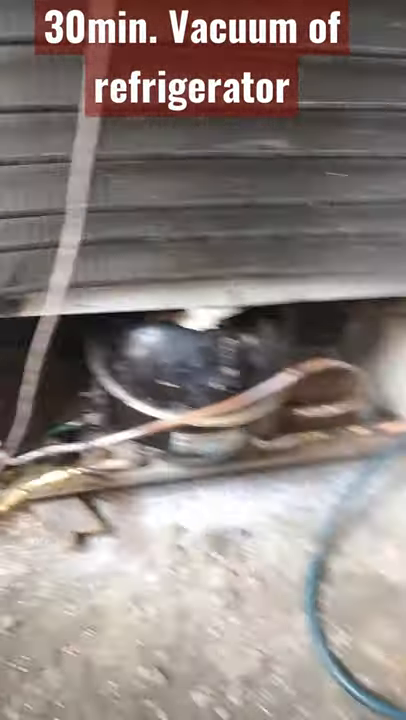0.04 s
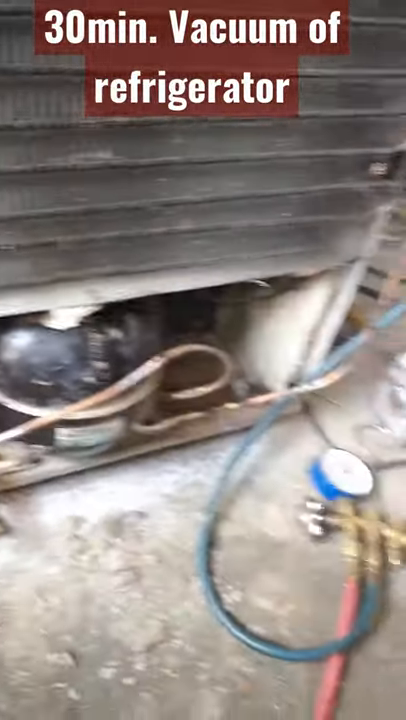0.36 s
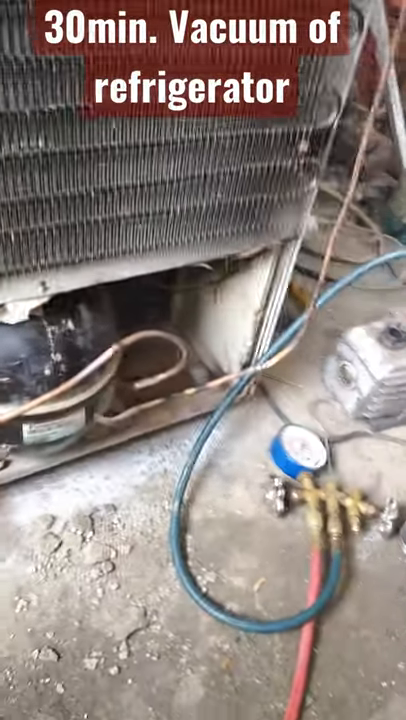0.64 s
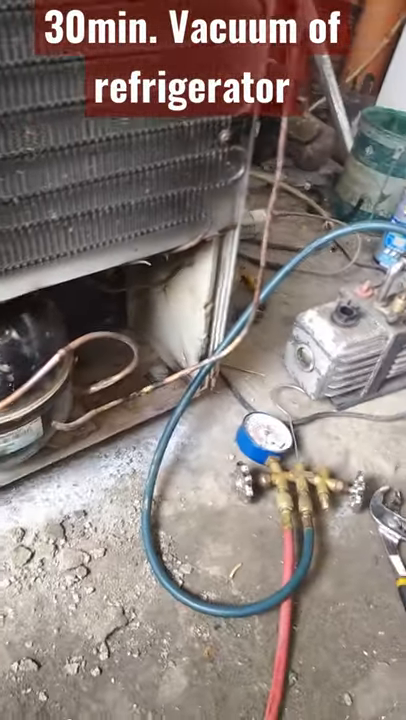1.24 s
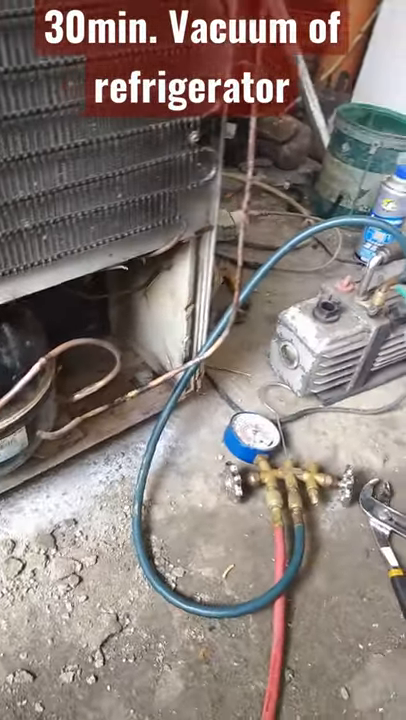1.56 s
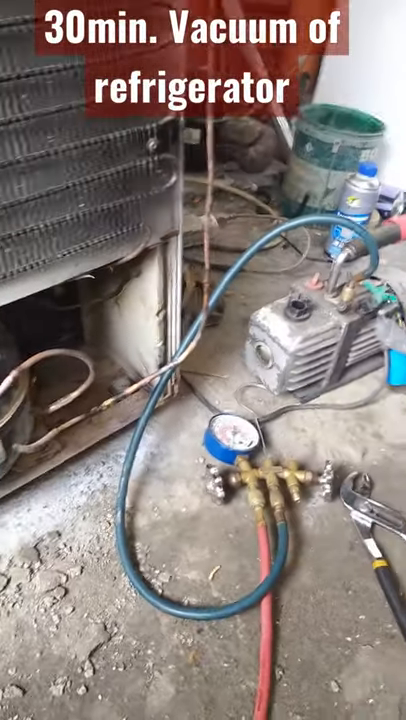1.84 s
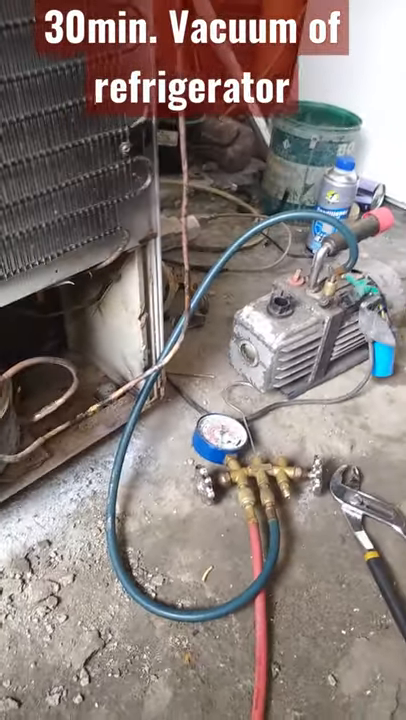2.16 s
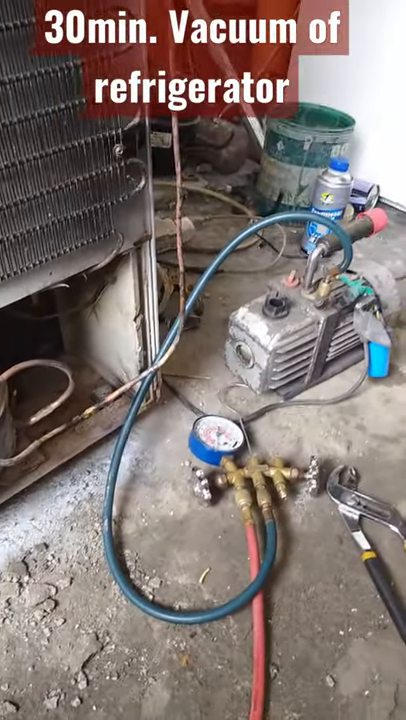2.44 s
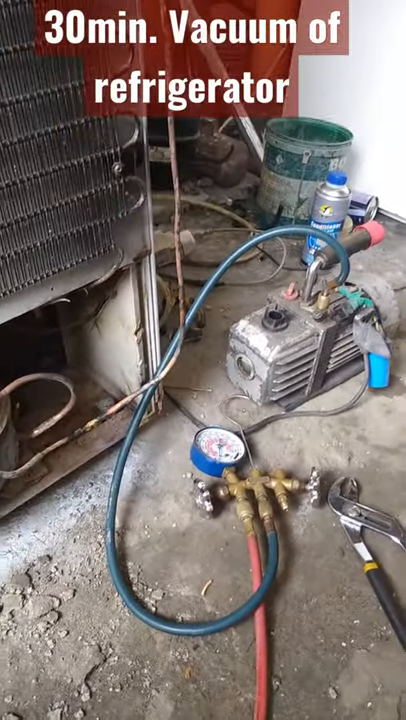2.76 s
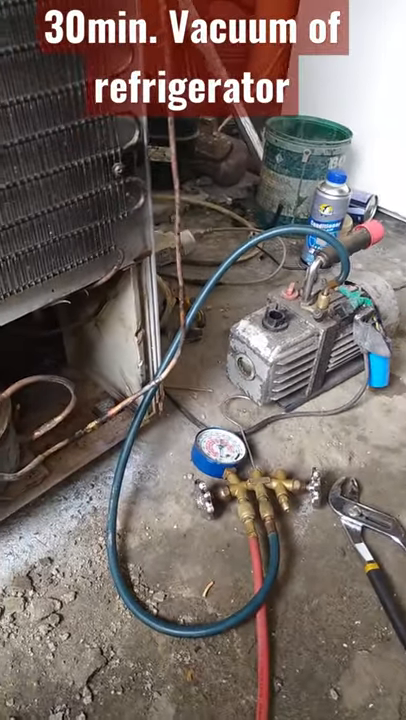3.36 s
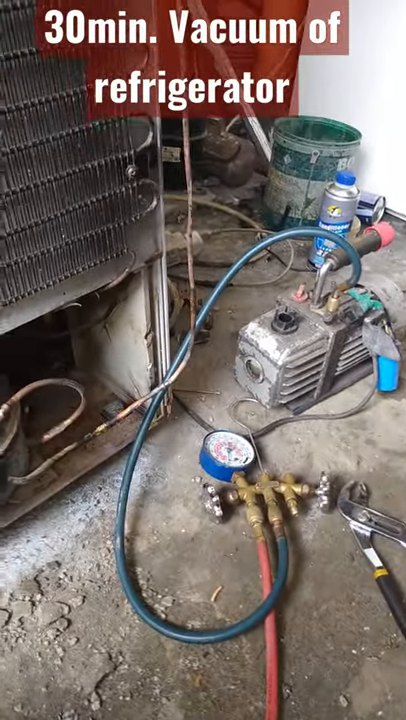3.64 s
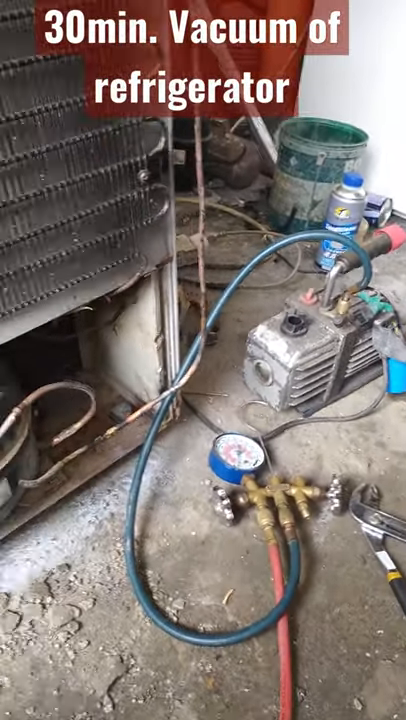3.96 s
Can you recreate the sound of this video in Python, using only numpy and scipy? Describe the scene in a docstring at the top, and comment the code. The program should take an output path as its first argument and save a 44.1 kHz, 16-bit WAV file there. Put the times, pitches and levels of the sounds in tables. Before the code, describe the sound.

A small vacuum pump whirs and hums steadily, with a few gritty foot scuffs.

```python
"""A small rotary-vane vacuum pump runs throughout on a concrete workshop floor: its fan whirs, its
shaft hums, and once a turn it knocks, rings its casing and spits a short rattle. The ring shifts in
level and side as the phone turns towards it. Small ticks come at 0.2 s and 0.4 s, then feet shift on
the gritty floor: light shuffles, one long scuff at 2.4 s, a faint metal chink at 2.9 s and a softer
second scuff at 3.2 s."""
import sys
import numpy as np
from scipy import signal
from scipy.fft import rfft, irfft
from scipy.io import wavfile
from scipy.ndimage import uniform_filter1d

SR = 44100
rng = np.random.default_rng(int(sys.argv[2]) if len(sys.argv) > 2 else 0)


def transcribe(u):
    """Save the signal u as a 16-bit wav file named by the first command-line argument.

    u: samples, shape (n,) or (channels, n), limited to [-1, 1]; the rate is SR.
    q: integer samples, one column per channel.
    """
    v = np.clip(np.atleast_2d(u).T, -1, 1)
    q = np.round(v * 32767).astype(np.int16)
    wavfile.write(sys.argv[1], SR, q)


N = 176400
SHAFT_HZ = 58.379


def undb(db):
    """Decibels to gain."""
    return 10 ** (np.asarray(db) / 20)


def unit_rms(x):
    """Scale to rms 1."""
    return x / np.sqrt(np.mean(x ** 2))


def pan(side_db):
    """Stereo gains for a left-right level difference."""
    return undb(np.array([[.5], [-.5]]) * side_db)


def drift(rate_hz):
    """Smooth random drift, rms 1."""
    hold = int(SR / rate_hz)
    steps = np.repeat(rng.standard_normal(N // hold + 1), hold)
    return unit_rms(uniform_filter1d(steps, hold)[:N])


def noise(spectrum, coherent_below_hz=600):
    """Stereo noise of a given spectral shape; both ears share the bass."""
    f = np.arange(N // 2 + 1) * SR / N + 1
    hz, *columns = np.array(spectrum, float).T
    level_db, side_db = (np.interp(np.log(f), np.log(hz), c) for c in columns)
    shared = 1 / (1 + (f / coherent_below_hz) ** 2)
    white = rfft(rng.standard_normal((3, N)))
    ears = np.sqrt(shared) * white[0] + np.sqrt(1 - shared) * white[1:]
    return irfft(ears * unit_rms(undb(level_db)) * pan(side_db), N)


def room(x, wet_db, t60_s=.37):
    """Add the workshop's short diffuse echo."""
    t = np.arange(SR // 2) / SR
    tail = rng.standard_normal((2, len(t))) * undb(-60 * t / t60_s) * (t > .003)
    wet = signal.fftconvolve(x, tail / np.sqrt(np.sum(tail[0] ** 2)), axes=1)[:, :N]
    return (x + undb(wet_db) * wet) / np.hypot(1, undb(wet_db))


def swells(t, events, spectrum):
    """Noise swells: Gaussian rise, exponential fall."""
    power = 0
    for peak_s, rise_s, fall_s, db in events:
        exponent = np.where(t < peak_s, ((t - peak_s) / rise_s) ** 2, (t - peak_s) / fall_s)
        power += (undb(db) * np.exp(-exponent)) ** 2
    return np.sqrt(power) * noise(spectrum)


def bursts(t, knock_times_s, attack_s, decay_s, scatter_db):
    """Envelope of one burst per knock, each of random strength; rms 1."""
    turn = np.maximum(np.searchsorted(knock_times_s, t) - 1, 0)
    age_s = np.abs(t - knock_times_s[turn])
    strength = undb(scatter_db * np.sqrt(3) * rng.uniform(-.92, 1, len(knock_times_s)))
    return unit_rms(strength[turn] * np.minimum(age_s / attack_s, 1) * np.exp(-age_s / decay_s))


def mode(x, hz, width_hz, skirt_hz):
    """One ringing mode, its skirts trimmed by a wider band-pass; rms 1."""
    for band_hz in (width_hz, skirt_hz):
        x = signal.lfilter(*signal.iirpeak(hz, hz / band_hz, fs=SR), x)
    return unit_rms(x)


# Fan air and room wash (frequency [Hz], relative density [dB], left-right [dB])
FAN_SPECTRUM = [(20, -6, 4), (50, -28, 12), (68, 6, 17), (94, -8.5, 33), (125, 4, 22.5), (175, 0.5, 24.5),
                (252, 7.5, 14.5), (318, -4, 25), (400, -4.5, 21), (514, 1.5, 5), (692, -1.5, -8),
                (786, 3.5, -5.5), (920, 8.5, -2.5), (1040, -2, 2.5), (1480, 1, 3), (1680, 1.5, 2),
                (2013, 12, 9), (2230, -13, 4), (2600, 8, 9.5), (3350, -0.5, 3.5), (4080, 8, -6.5),
                (4940, 0, -6), (6150, -7, 7), (6740, 1, -1.5), (7180, -11.5, 4), (8050, 0, -17),
                (8520, -2.5, -4.5), (9870, -2.5, 18.5), (11940, -5.5, 4.5), (13600, -0.5, 12),
                (15200, -15.5, -36)]


def fan_whir(level_db=-43, flutter_db=1.16):
    """Steady air from the motor's fan."""
    return undb(level_db + flutter_db * drift(12)) * noise(FAN_SPECTRUM)


# Motor tones (frequency [Hz], level [dB], left-right [dB])
MOTOR_PARTIALS = [(802.6, -62, -2), (877, -64, -7), (934, -72, 1), (962, -63, -2), (993, -66, 2),
                  (3040, -63.5, 0)]


def motor_tones(t, waver_db=3, drift_cycles=.073):
    """Faint motor tones, wavering in level and phase."""
    tones = 0
    for hz, db, side_db in MOTOR_PARTIALS:
        gain = np.sqrt(2) * undb(db + waver_db * drift(10)) * pan(side_db)
        tones += gain * np.sin(2 * np.pi * (hz * t + drift_cycles * drift(8)))
    return tones


# Shaft hum (harmonic [x shaft rate], level [dB], left-right [dB])
SHAFT_HARMONICS = [(2, -65, 1), (3, -54, 9), (4, -38.5, 16.5), (5, -61.5, 13.5), (6, -67, 11),
                   (7, -64, 7.5), (8, -67.5, -1)]


def shaft_hum(t, wander_turns=.0054, flutter_db=.37):
    """Low multiples of the shaft rate; the fourth dominates."""
    turns = SHAFT_HZ * t + wander_turns * drift(5)
    hum = 0
    for harmonic, db, side_db in SHAFT_HARMONICS:
        gain = np.sqrt(2) * undb(db + flutter_db * drift(8.1)) * pan(side_db)
        hum += gain * np.sin(2 * np.pi * (harmonic * turns + rng.random()))
    return hum


# Modes of a small metal piece (frequency [Hz], relative level [dB])
METAL_MODES = [(11181, 5), (12064, -8), (12855, 4)]


def metal_chink(t, onset_s=2.931, gain_db=-49, t60_s=.35):
    """A small piece of metal rings once."""
    age_s = np.maximum(t - onset_s, 0)
    modes = sum(undb(db) * np.sin(2 * np.pi * hz * age_s) for hz, db in METAL_MODES)
    return undb(gain_db - 60 * age_s / t60_s) * modes * pan(side_db=3)


# A short, dull tick at 0.18 s, then sole drags; sand hisses; sole landings; dull bumps; small ticks
# (peak time [s], rise [s], fall [s], level [dB])
DULL_TICK_AND_DRAGS = [(.18, 0.0032, 0.0069, -38), (1.465, 0.021, 0.035, -44), (1.80, .015, 0.053, -39.5),
                       (2.372, 0.042, 0.09, -31.5), (2.465, 0.053, .04, -35.5), (3.128, 0.02, 0.043, -40),
                       (3.195, 0.053, 0.026, -39.5)]
SAND_EVENTS = [(1.83, .03, .05, -46), (2.41, 0.048, 0.034, -34), (2.70, .015, .05, -45),
               (2.937, .008, 0.03, -42.5), (3.19, 0.068, 0.028, -43.5)]
TREAD_EVENTS = [(.45, .02, 0.065, -53), (1.24, .008, 0.018, -46), (1.795, 0.018, 0.014, -47.5),
                (2.327, 0.0074, 0.028, -36), (2.471, 0.03, .036, -27.5), (3.122, 0.017, 0.023, -37),
                (3.19, 0.036, 0.11, -46), (3.87, 0.068, 0.14, -49)]
BUMP_EVENTS = [(.21, .01, 0.018, -50), (.605, .01, 0.014, -47), (1.065, 0.047, .04, -53),
               (2.515, 0.068, 0.028, -40.5), (3.14, 0.016, 0.048, -47), (3.275, 0.026, 0.02, -45)]
TICK_EVENTS = [(.365, .0006, .0015, -39), (.3702, .0005, .0012, -29)]
# Their spectra (frequency [Hz], relative density [dB], left-right [dB])
DULL_TICK_AND_DRAG_SPECTRUM = [(40, -54, 22), (200, -9, 18), (450, 2, 1), (880, 8.5, 1), (1330, 6.5, 2),
                               (2400, 9, 2.5), (3250, 0, -4), (5000, -7, -2), (9100, -3.5, -3),
                               (14000, -31, 7)]
SAND_SPECTRUM = [(300, -43, 0), (2000, -20, -5), (4170, -1, -10), (5900, -4, 2), (7800, 11.5, 1),
                 (11400, 12.5, 9.5), (14600, -2, 15)]
TREAD_SPECTRUM = [(25, -42, 12), (60, -20, 6), (154, -6, 14), (304, -8, 16), (464, 2, 1.5), (505, -5.5, 0),
                  (565, 8, 1), (597, -4, 6), (860, -3.5, -2), (1100, -9, 0), (2000, -21.5, 0),
                  (5000, -38, -9)]
BUMP_SPECTRUM = [(30, -31, 3), (70.6, -8, 7), (103, 6, 10), (161, 7, 17), (400, -32, 12), (1500, -72, -6)]
TICK_SPECTRUM = [(500, -25, 0), (1400, -9, 0), (2100, 0, 0), (3600, -1, -1), (5800, -2, -2), (8000, -8, 2),
                 (14000, -11, 4)]


def feet(t, grit_db=1, grit_hz=500):
    """Short ticks, then soles drag, hiss and land; loose grit makes the friction grainy."""
    grit = unit_rms(undb(grit_db * drift(grit_hz)))
    tick_and_drags = swells(t, DULL_TICK_AND_DRAGS, DULL_TICK_AND_DRAG_SPECTRUM)
    sand = swells(t, SAND_EVENTS, SAND_SPECTRUM)
    treads = swells(t, TREAD_EVENTS, TREAD_SPECTRUM)
    bumps = swells(t, BUMP_EVENTS, BUMP_SPECTRUM)
    ticks = swells(t, TICK_EVENTS, TICK_SPECTRUM)
    return room(grit * (tick_and_drags + sand) + treads + bumps + ticks, wet_db=-6)


# Rattle (frequency [Hz], relative density [dB], left-right [dB])
RATTLE_SPECTRUM = [(300, -23, 8), (1210, -17, 1), (1760, 1, 16), (2330, -9, -7), (2830, -10.5, -18),
                   (3500, 0, -12), (4420, 1.5, 19), (5160, -4, -4), (6450, -12, -14), (6860, 3.5, 5),
                   (7240, -11, 9), (8000, 4, 15), (9000, 0.5, 3), (9370, 3.5, 9), (10070, 4, 16.5),
                   (10820, 0.5, 6), (11500, -7.5, -3), (12900, 4, 7), (14200, -30.5, 2)]


def pump_rattle(t, knock_times_s, level_db=-48):
    """A short rasp follows each knock."""
    envelope = bursts(t, knock_times_s, attack_s=.0015, decay_s=.0091, scatter_db=4)
    return undb(level_db) * envelope * noise(RATTLE_SPECTRUM)


# Exhaust valve click (frequency [Hz], relative density [dB], left-right [dB])
VALVE_SPECTRUM = [(3000, -22, 7), (7000, -6, -14), (8100, -14.5, 6), (8860, -24.5, -1), (9420, 0, -4.5),
                  (10200, 7.5, 6), (11440, -5.5, 0), (14200, -19.5, -8)]


def valve_clicks(t, knock_times_s, level_db=-49.5):
    """The exhaust valve clicks brightly once a turn."""
    envelope = bursts(t, knock_times_s, attack_s=.0002, decay_s=.0019, scatter_db=3)
    return undb(level_db) * envelope * noise(VALVE_SPECTRUM)


# Casing modes (frequency [Hz], width [Hz], level [dB], left-right [dB])
CASING_MODES = [(804, 53, -63, 6), (885, 40, -65.5, -4), (935, 18, -68.5, -18.5), (996, 33, -79, 14),
                (1518, 20, -74, -1), (1650, 53, -63, 5), (1733, 87, -52, 8), (1863, 82, -56.5, -1),
                (1952, 60, -61, -2), (2750, 83, -58.5, -17), (3206, 74, -61.5, -5),
                (3815, 176, -56.5, -0.5), (4275, 440, -55, -8.5), (5204, 67, -63.5, -6)]
# Phone turning (time [s], casing gain [dB], ring gain [dB], ring left-right [dB])
PHONE_TURN = [(0, -2, -4, 6), (.35, 3, -6.5, 17), (1.0, 0, -6, 17), (1.5, 1, 0.5, 4), (2.1, 2.5, 1.5, -2.5),
              (3.0, 2, 0.5, -4.5), (4, 2.5, 1.5, 1)]


def casing_knocks(t, knock_times_s, jitter_s=12e-6, scatter_db=.9, ring_base_db=-47):
    """One knock a turn excites the casing's modes and one long, slightly delayed ring."""
    timing, strength = rng.standard_normal((len(knock_times_s), 2)).T
    onsets = np.clip((knock_times_s + jitter_s * timing) * SR, 0, N - 1)
    pulses = np.bincount(np.round(onsets).astype(int), undb(scatter_db * strength), N)
    times_s, *columns = np.array(PHONE_TURN).T
    casing_db, ring_db, ring_side_db = (np.interp(t, times_s, c) for c in columns)
    casing = sum(undb(db) * pan(side_db) * mode(pulses, hz, width_hz, skirt_hz=hz / 5)
                 for hz, width_hz, db, side_db in CASING_MODES)
    ring = mode(pulses, hz=2765, width_hz=22.8, skirt_hz=370)
    delay_s, right_lag_s = 816e-6, 40e-6
    ring = np.array([np.interp(t - delay_s - lag_s, t, ring) for lag_s in (0, right_lag_s)])
    ring *= undb(ring_base_db + ring_db) * pan(ring_side_db)
    return room(casing * undb(casing_db), wet_db=-9) + ring


def scene():
    """The running pump and the feet beside it."""
    t = np.arange(N) / SR
    knock_times_s = np.arange(.0036, N / SR, 1 / SHAFT_HZ)
    pump = shaft_hum(t) + motor_tones(t) + casing_knocks(t, knock_times_s)
    pump += pump_rattle(t, knock_times_s) + valve_clicks(t, knock_times_s) + fan_whir()
    return pump + feet(t) + metal_chink(t)


def record(dry):
    """The phone cuts the top treble steeply."""
    cutoff_hz = 14350
    return signal.sosfilt(signal.ellip(10, .2, 80, cutoff_hz, fs=SR, output="sos"), dry)


dry = scene()
out = record(dry)
transcribe(out)
```